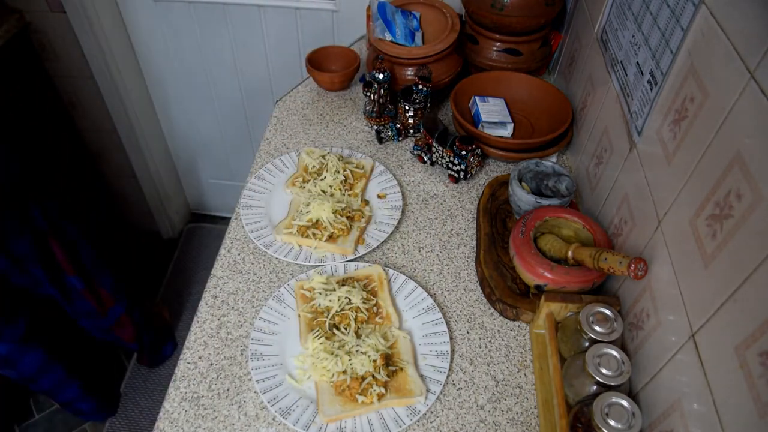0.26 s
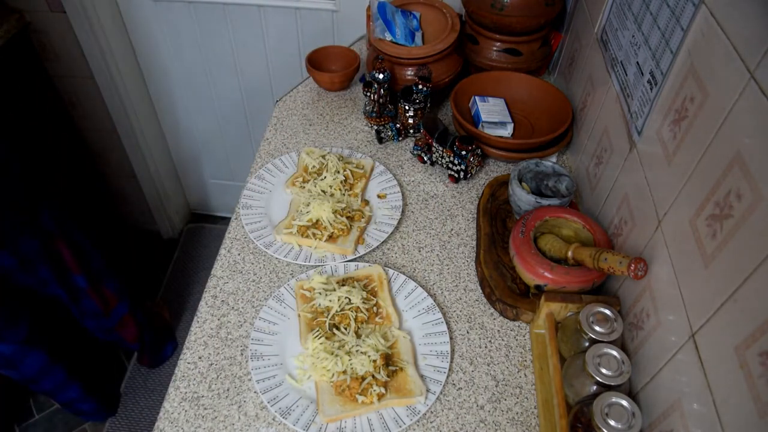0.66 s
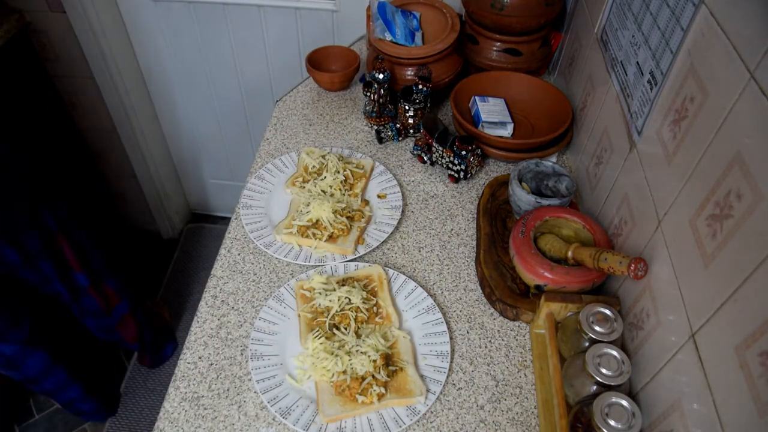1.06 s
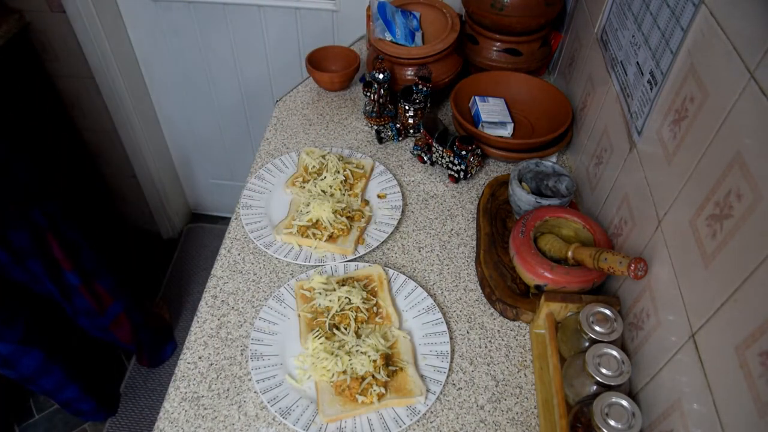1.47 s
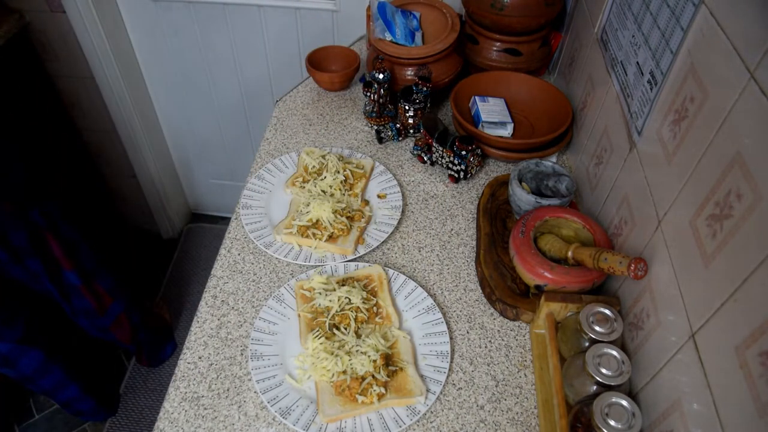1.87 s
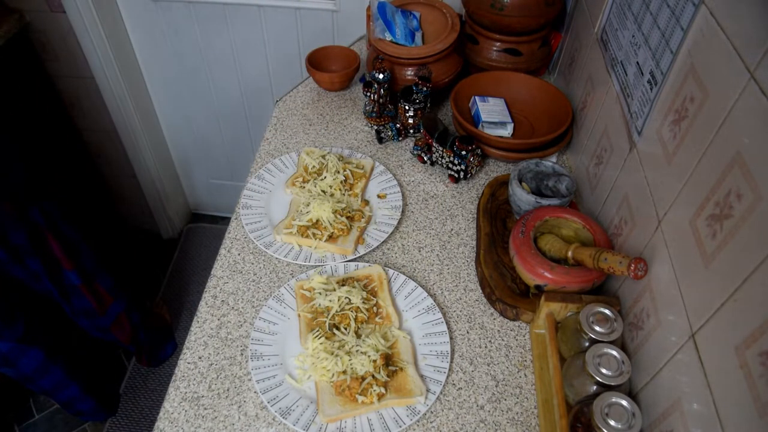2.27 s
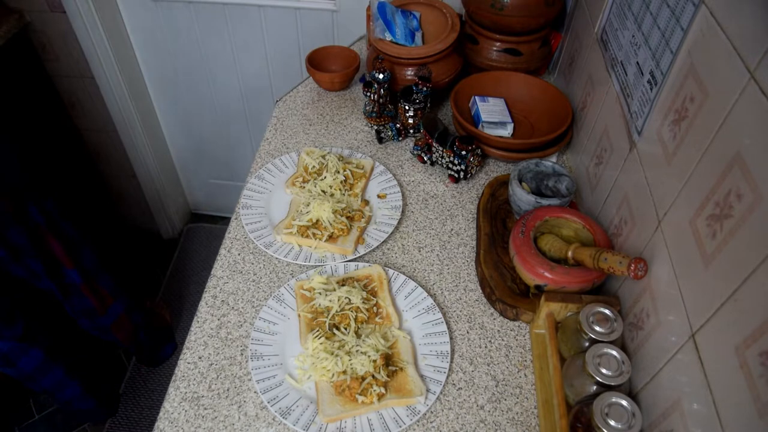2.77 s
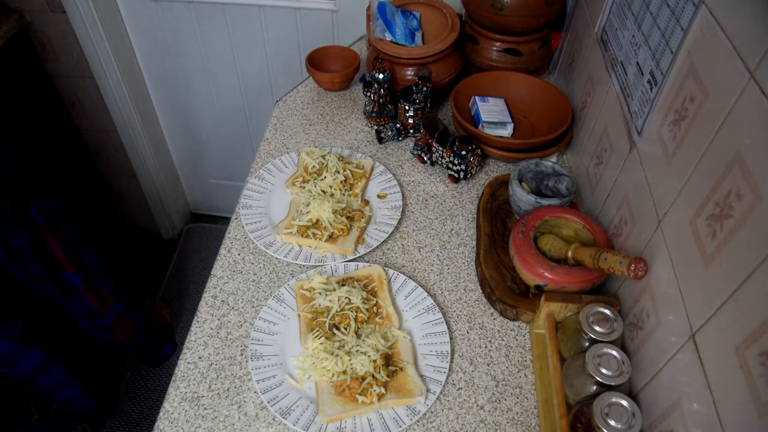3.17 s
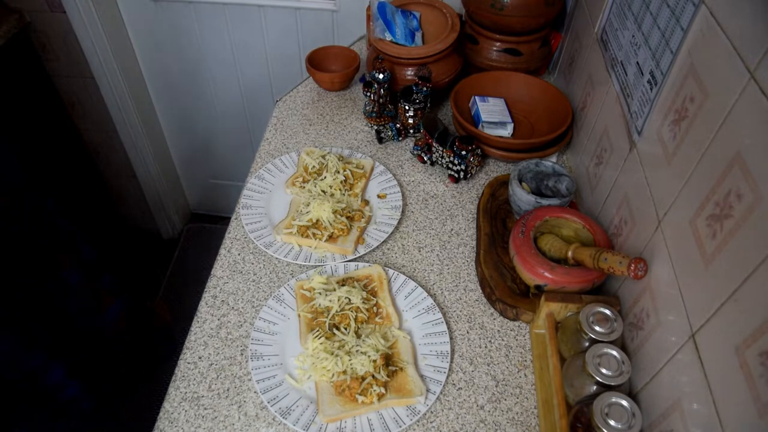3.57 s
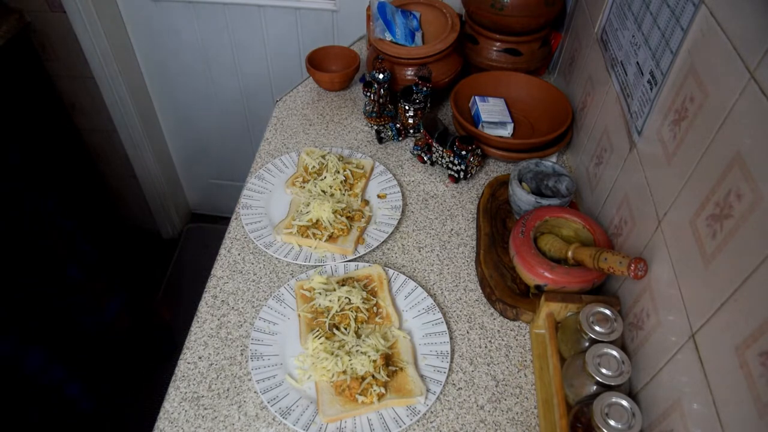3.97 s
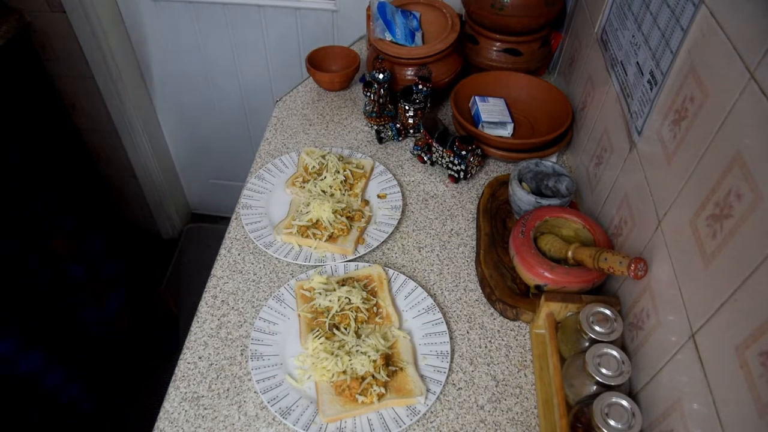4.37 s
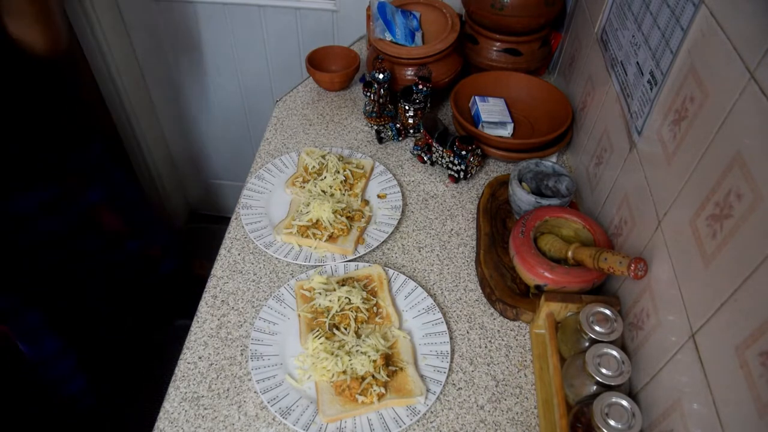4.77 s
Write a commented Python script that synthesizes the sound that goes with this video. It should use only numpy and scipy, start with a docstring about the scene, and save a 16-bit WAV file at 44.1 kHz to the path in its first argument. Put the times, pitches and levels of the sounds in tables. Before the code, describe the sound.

A small, hard tiled kitchen with a short bright echo, heard through one microphone over the counter, the same in both channels. A soft, steady low refrigerator hum and faint room rush run throughout. After a slight tap at 0.1 s and a light knock near 0.3, a wooden drawer bangs loudly at 0.43 and rattles, hollow and woody, until about 0.65. Faint fork ticks come near 1.0; a light spoon clinks brightly around 1.57. At 2.0 to 2.25 utensils crash onto crockery, the loudest moment, with a brief hard clang at 2.09. Weaker knocks follow to 2.65, then faint rummaging grows firmer until a sharp clatter and quick steel scrape at 3.3. Small contacts trail to 3.6, a spoon clinks at 3.7. Forks tick near 4.43, a rim rubs a plate in even stuttering pulses at 4.53 to 4.75, and a short squeal and dry counter taps end it near 5.0.

```python
"""In a small tiled kitchen someone fetches cutlery, heard through one microphone over the counter.
A wooden drawer bangs and rattles, utensils crash onto crockery, are rummaged through and drawn out,
spoons clink and a rim rubs along a plate: shaped noise plus decaying tones for each contact.
Sliding steel is filtered random catches, and squeals and soft bumps are bands of noise.
A refrigerator hums throughout: a steady sine over soft noise."""
import sys
import numpy as np
from scipy import signal
from scipy.fft import rfft, irfft, next_fast_len
from scipy.io import wavfile

SR = 44100
rng = np.random.default_rng(int(sys.argv[2]) if len(sys.argv) > 2 else 0)


def master_out(mix):
    """Clip the mix to full scale and print it as 16-bit PCM to the path in sys.argv[1]."""
    frames = np.transpose(np.atleast_2d(mix))
    ceiling = np.clip(frames, -1, 1)
    pcm = np.round(ceiling * 32767).astype(np.int16)
    wavfile.write(sys.argv[1], SR, pcm)


N = 221528

# In all tables level_db sets balance before the final rounding and gain in record().
# Colour tables give only the shape of a spectrum.
# utensils and crockery, struck or slid over: pitch_hz [Hz], density_db [dB per Hz]
CLATTER_COLOUR = [(40, -33), (70, -15.5), (130, -12), (250, -13.5), (650, -10), (900, -6), (1350, -4),
                  (1800, -7), (2600, -5), (4000, -4), (5500, -7), (7500, -14.5), (10800, -15),
                  (15500, -23.5)]
# light steel, spoons and forks: pitch_hz [Hz], density_db [dB per Hz]
SPOON_COLOUR = [(300, -24), (1200, -11.5), (2200, -3.5), (4700, 5), (7000, 2.5), (10000, 4), (15500, -3.5)]
# the tiled room: time to fade by 60 dB, below and above 6 kHz [s]
ROOM_T60_S = (0.43, 0.38)
RING_S = .7   # longest ring of one contact
AGE = np.arange(next_fast_len(int(RING_S * SR), True)) / SR   # seconds since a contact


def from_db(db):
    """Turn decibels into gain."""
    return 10 ** (np.asarray(db) / 20)


def rms_one(x):
    """Scale a sound to an average (rms) strength of 1."""
    return x / np.sqrt(np.mean(x ** 2) + 1e-20)


def at_hz(points, hz):
    """Read a table between its points, with pitch on a logarithmic scale."""
    table_hz, value = np.transpose(points)
    return np.interp(np.log(hz), np.log(table_hz), value)


def fade(t, t60):
    """Free decay that loses 60 dB in t60 seconds."""
    return np.exp(-np.log(1000) * t / t60)


def add(out, s, sound):
    """Mix a sound in from time s, in seconds."""
    i = max(0, round(s * SR))
    out[i:i + len(sound)] += sound[:N - i]


def coloured(drive, colour):
    """Filter a drive by a colour table, then scale it to rms 1."""
    size = next_fast_len(N, True)
    hz = np.fft.rfftfreq(size, 1 / SR) + 1   # +1 avoids log(0)
    spectrum = rfft(drive, size) * from_db(at_hz(colour, hz))
    return rms_one(irfft(spectrum, size)[:N])


def scattered(hz, t60, scatter):
    """A tone heard by way of the walls: its height and phase wander as reflections arrive."""
    knots = np.arange(0, RING_S, .025)   # a new random value every 25 ms
    random_path = rng.standard_normal((len(knots), 2)) @ [1, 1j]
    wander = 1 + scatter * np.interp(AGE, knots, random_path)
    decay = fade(AGE, t60)
    same_energy = np.linalg.norm(decay) / np.linalg.norm(decay * wander)
    return decay * wander * np.exp(2j * np.pi * hz * AGE) * same_energy


def blows(rows, colour, modes, ring_db, rise_s, body_t60, room_db, scatter, patchy_db):
    """Each contact gives a dense short ring, the object's clear tones and the room's tail."""
    out = np.zeros(N)
    hz = np.fft.rfftfreq(len(AGE), 1 / SR) + 1
    octaves = np.log2(np.maximum(hz, 250) / 1000)   # above or below 1 kHz
    spectrum = from_db(at_hz(colour, hz))
    treble = hz ** 2 / (hz ** 2 + 6000 ** 2)

    # the body's ring and the room's tail add as powers; reflections take a moment to build up
    far = from_db(room_db) * (1 - np.exp(-AGE / 0.0041))
    low_decay, high_decay = (np.hypot(fade(AGE, body_t60), far * fade(AGE, t60)) for t60 in ROOM_T60_S)

    rings = [from_db(db) * scattered(mode_hz, t60, scatter) for mode_hz, db, t60 in modes]
    rings = np.array(rings).reshape(-1, len(AGE))
    rise = 1 - np.exp(-AGE / rise_s)   # glancing contacts swell
    partials = np.arange(0, SR / 2, 110)   # spacing of the short-lived partials, Hz

    for s, level_db, tilt_db in rows:
        # harder contacts are brighter, and each point of contact favours other partials
        patches = patchy_db * np.interp(hz, partials, rng.standard_normal(len(partials)))
        random_phase = np.exp(2j * np.pi * rng.random(len(hz)))
        dense = spectrum * from_db(tilt_db * octaves + patches) * random_phase
        low = irfft(dense * (1 - treble), len(AGE))
        high = irfft(dense * treble, len(AGE))
        sound = (low * low_decay + high * high_decay) / np.std(low + high)
        mode_phase = np.exp(2j * np.pi * rng.random(len(modes)))
        sound += from_db(ring_db) * np.real(mode_phase @ rings)
        add(out, s, from_db(level_db) * sound * rise)
    return out


def rattle(rows, gap_s, loss_db, jitter):
    """A loose thing strikes again at uneven gaps; its contacts weaken, slowly at first."""
    contacts = []
    for s, level_db, tilt_db, count in rows:
        for k in range(round(count)):   # a fractional count also adjusts the weakening
            late = gap_s * (k + jitter * rng.uniform(-1, 1) * (k > 0))
            weaker_db = loss_db * (k / count) ** 2
            contacts.append((s + late, level_db - weaker_db, tilt_db))
    return contacts


def strokes(rows):
    """Gain of hand strokes: each gathers speed, then slows to rest."""
    t = np.arange(N) / SR
    swell = 0.29   # share of a stroke spent gathering speed
    return sum(from_db(db) * np.interp((t - s) / length, [0, swell, 1], [0, 1, 0])
               for s, length, db in rows)


def refrigerator():
    """Mains hum of the compressor, a sine, over the soft rush of the room, shaped noise."""
    # the room's rush: pitch_hz [Hz], density_db [dB per Hz]
    air_colour = [(15, -40), (25, -18.5), (96, -2.5), (129, -13), (178, -7), (433, -4), (509, -10),
                  (871, -14.5), (1080, -19), (1200, -10.5), (1570, -18.5), (2920, -21.5), (6730, -29),
                  (11800, -31), (15500, -40)]
    hum_hz, hum_db, air_db = 102, -57, -53.5
    hum = np.sqrt(2) * np.sin(2 * np.pi * hum_hz * np.arange(N) / SR)
    air = coloured(rng.standard_normal(N), air_colour)
    return from_db(hum_db) * hum + from_db(air_db) * air


def bumps(t60, width):
    """Padded knocks: noise through a broad, mostly low resonance that dies away quickly."""
    # soft bumps: start_s [s], level_db [dB], pitch_hz [Hz]
    soft_knocks = [(1.497, -42.5, 59.7), (2.102, -29.5, 125), (3.171, -37.5, 294.3), (4.073, -39.5, 67),
                   (4.44, -43, 65.1)]
    out = np.zeros(N)
    for s, level_db, hz in soft_knocks:
        body = signal.butter(2, [hz / (1 + width), hz * (1 + width)], "band", fs=SR, output="sos")
        boom = rms_one(signal.sosfilt(body, rng.standard_normal(len(AGE))))
        rise = 1 - np.exp(-AGE / 0.003)
        add(out, s, from_db(level_db) * boom * fade(AGE, t60) * rise)
    return out


def taps():
    """Small dry taps on the counter: short bursts of shaped noise without clear tones."""
    # taps: start_s [s], level_db [dB], brightness_db [dB per octave]
    contacts = [(.103, -40, 0), (1.252, -47.5, -9), (1.31, -48, 4), (3.932, -42.5, -1), (4.123, -36.5, 1),
                (4.383, -48, -5), (4.84, -38.5, 3), (4.873, -36.5, 1), (4.98, -37, -3.5), (4.997, -37.5, 6)]
    # the counter: pitch_hz [Hz], density_db [dB per Hz]
    colour = [(50, -45), (200, -8.5), (600, -5), (1200, 4), (2000, -1), (3200, -11.5), (6000, -24.5),
              (15000, -75)]
    return blows(contacts, colour, [], ring_db=0, rise_s=0.00079, body_t60=0.2,
                 room_db=-12.5, scatter=0, patchy_db=4.5)


def slide(catches_per_s, grain_db, room_db):
    """Tiny catches of steel on steel excite the same pile of utensils and crockery."""
    # strokes of steel over steel: start_s [s], length_s [s], level_db [dB]
    pulls = [(-.06, 0.21, -50), (1.79, 0.37, -51.5), (3.07, 0.65, -48), (3.26, 0.54, -50.5),
             (3.292, 0.087, -23), (3.39, 0.11, -37.5), (4.3, 0.5, -49), (4.79, 0.23, -46)]
    catches = (rng.random(N) < catches_per_s / SR) * rng.standard_normal(N)
    sizes = from_db(grain_db * np.minimum(rng.exponential(1, N), 4))
    direct = strokes(pulls) * coloured(catches * sizes, CLATTER_COLOUR)
    room = rng.standard_normal(len(AGE)) * fade(AGE, np.mean(ROOM_T60_S))
    echoes = signal.fftconvolve(direct, room / np.linalg.norm(room))[:N]
    return direct + from_db(room_db) * echoes


def squeal():
    """Steel dragged over glaze: rapid catches, as noise, keep a broad resonance ringing."""
    # short squeals: start_s [s], length_s [s], level_db [dB]
    drags = [(4.785, 0.071, -35.5), (4.835, 0.02, -30)]
    band = signal.butter(2, (3440, 5570), "band", fs=SR, output="sos")   # edges in Hz
    return strokes(drags) * rms_one(signal.sosfilt(band, rng.standard_normal(N)))


def plate_rim():
    """Stick and slip along a plate: one contact each time the rim lets go, at an even pace."""
    # the rubbed rim: pitch_hz [Hz], density_db [dB per Hz]
    colour = [(900, -14.5), (1350, -3), (1750, 1.5), (2300, 0.5), (3000, -2.5), (7000, -15), (12000, -46)]
    # the plate's tones: pitch_hz [Hz], level_db [dB], t60_s [s]
    modes = [(1500, -6, .2), (1690, -4, .2), (1760, -4, .18), (1930, -7, .15), (2150, -8, .15)]
    start_s, slip_s, level_db = 4.528, .0425, -37.5
    slips = [(start_s + k * slip_s, level_db, 0) for k in range(6)]
    return blows(slips, colour, modes, ring_db=0.5, rise_s=0.0041, body_t60=0.22,
                 room_db=-24, scatter=0.86, patchy_db=4.5)


def forks():
    """Forks brush and tick: rattling contacts set light steel tones ringing."""
    # ticks: start_s [s], level_db [dB], brightness_db [dB per octave], contacts [count]
    brushes = [(.992, -42, -2, 3.4), (1.66, -43, -6, 1), (1.777, -48.5, -1.5, 1.02), (3.844, -45, -2, 0.95),
               (3.88, -41.5, -3, 1.22), (4.068, -47.5, -3.5, 1.1), (4.426, -33.5, 1, 1.48),
               (4.51, -39, -6, 1), (4.66, -37, -4, 1)]
    # a fork's tones: pitch_hz [Hz], level_db [dB], t60_s [s]
    modes = [(2810, -14, .15), (3055, -7, .16), (4400, -13, .2), (5300, -13, .22), (5900, -13, .22),
             (7500, -13, .18), (9350, -11, .18), (11150, -13, .2), (12400, -16, .15)]
    ticks = rattle(brushes, gap_s=0.013, loss_db=17.5, jitter=.2)
    return blows(ticks, SPOON_COLOUR, modes, ring_db=1, rise_s=0.0019, body_t60=0.19,
                 room_db=-3.5, scatter=1.0, patchy_db=7.0)


def spoon():
    """Light clinks of a spoon: single contacts with bright steel tones."""
    # clinks: start_s [s], level_db [dB], brightness_db [dB per octave]
    clinks = [(1.452, -45, -2), (1.567, -33, 1.5), (1.69, -49, -2), (3.687, -34.5, -4)]
    # the spoon's tones: pitch_hz [Hz], level_db [dB], t60_s [s]
    modes = [(1308, -12, .4), (2130, -20, .25), (3104, -12, .2), (4262, -12, .22), (4375, -9, .28),
             (5725, -6, .25), (7285, -9, .22), (9082, -7, .2), (10000, -13, .18), (10960, -10, .22),
             (12390, -13, .22), (13135, -7, .2), (14110, -11, .16)]
    return blows(clinks, SPOON_COLOUR, modes, ring_db=3, rise_s=0.0023, body_t60=0.23,
                 room_db=-14.5, scatter=0.5, patchy_db=5)


def drawer():
    """A wooden drawer knocks against its frame and its panels ring."""
    # knocks: start_s [s], level_db [dB], brightness_db [dB per octave], contacts [count]
    bangs = [(.286, -33.5, -1.5, 1), (.430, -16.5, 0.5, 1.1), (.439, -12, 0.4, 3.9), (.499, -14, 1, 6.67),
             (.825, -48, 4, 1)]
    # the wood: pitch_hz [Hz], density_db [dB per Hz]
    colour = [(30, -35), (60, -17), (120, -12), (160, -5.5), (230, -2), (400, -3.5), (750, -7),
              (1350, -8.5), (1800, -15.5), (4000, -21), (7000, -32), (15000, -46)]
    # the panels' tones: pitch_hz [Hz], level_db [dB], t60_s [s]
    modes = [(126, -11, .55), (201, -5, .45), (248, -5, .45), (261, -5, .45), (316, -7, .42),
             (485, -15, .45), (511, -14, .5), (602, -13, .5), (771, -12, .4), (871, -14, .4),
             (1122, -14, .4), (1400, -16, .45)]
    knocks = rattle(bangs, gap_s=.021, loss_db=20, jitter=.25)
    return blows(knocks, colour, modes, ring_db=-1.5, rise_s=0.0028, body_t60=0.3,
                 room_db=-12.5, scatter=0.53, patchy_db=2.5)


def clang():
    """A heavy utensil lands hard: its handle and blade ring briefly, damped by the pile."""
    # landings: start_s [s], level_db [dB], brightness_db [dB per octave]
    landings = [(2.089, -11.5, 6), (2.100, -24, -4.5)]
    # handle and blade tones: pitch_hz [Hz], level_db [dB], t60_s [s]
    modes = [(2490, -5, .1), (2582, 0, .14), (2668, -2, .14), (2790, -4, .11), (5650, -13, .09),
             (5920, -13, .1)]
    return blows(landings, CLATTER_COLOUR, modes, ring_db=5.5, rise_s=.0012, body_t60=0.031,
                 room_db=-9.0, scatter=.3, patchy_db=6)


def rummage(count):
    """The pile shifts under the searching hand: faint contacts that tend to grow firmer."""
    start_s, end_s = 2.72, 3.27
    first_db, growth_db, spread_db, tilt_db = -50, 8, 1, -3   # tilt is per octave
    progress = (np.arange(count) + rng.random(count)) / count
    times = start_s + (end_s - start_s) * progress
    levels = first_db + growth_db * progress + spread_db * rng.standard_normal(count)
    return [(s, db, tilt_db) for s, db in zip(times, levels)]


def clatter():
    """Utensils fall on each other and on crockery, and shift while being searched."""
    # falls: start_s [s], level_db [dB], brightness_db [dB per octave], contacts [count]
    falls = [(2.004, -18, -3, 1), (2.089, -10, 1, 4.7), (2.205, -13.5, 1, 1.53), (2.458, -37.5, -4, 1),
             (2.526, -38.5, -1, 1), (2.636, -36.5, -1.5, 1), (2.951, -36.5, -.5, 1.014), (3.093, -28, 0, 1),
             (3.324, -18, 3.5, 1.8), (3.405, -37, 1.5, 1.01), (3.447, -33, 4, 1),
             (3.528, -34.5, -0.5, 0.92), (3.604, -39.5, 0.5, 1), (4.301, -47.5, -4.5, 1),
             (4.838, -33, 8, 1)]
    # tones of crockery and the steel lying in it: pitch_hz [Hz], level_db [dB], t60_s [s]
    modes = [(877, -20, .4), (1297, -16, .5), (1922, -22, .45), (2337, -19, .35), (2665, -16, .4),
             (3762, -18, .3), (3955, -17, .3), (4015, -14, .35), (4140, -15, .33), (4168, -11, .38),
             (4595, -20, .35), (5174, -17, .36), (5440, -20, .3), (6078, -24, .3), (8312, -25, .3),
             (8683, -23, .3), (11175, -21, .33)]
    contacts = rattle(falls, gap_s=.018, loss_db=11.5, jitter=.2) + rummage(count=16)
    return blows(contacts, CLATTER_COLOUR, modes, ring_db=-2.5, rise_s=0.0018, body_t60=0.13,
                 room_db=-5, scatter=0.47, patchy_db=4.0)


def scene():
    """All sources meet at one microphone that feeds both channels."""
    mono = refrigerator() + bumps(t60=0.24, width=0.29) + taps()
    mono += slide(catches_per_s=2500, grain_db=-0.5, room_db=-6.5) + squeal()
    mono += plate_rim() + forks() + spoon()
    mono += drawer() + clang() + clatter()
    return np.stack([mono, mono])


def record(dry):
    """Round the loudest peaks, lift the rest slightly and cut the top above 15.8 kHz."""
    rounded = 1.186 * np.tanh(dry / 1.106)
    top_cut = signal.ellip(12, .1, 80, 15800, fs=SR, output="sos")
    return signal.sosfilt(top_cut, rounded)


dry = scene()
out = record(dry)
master_out(out)
```